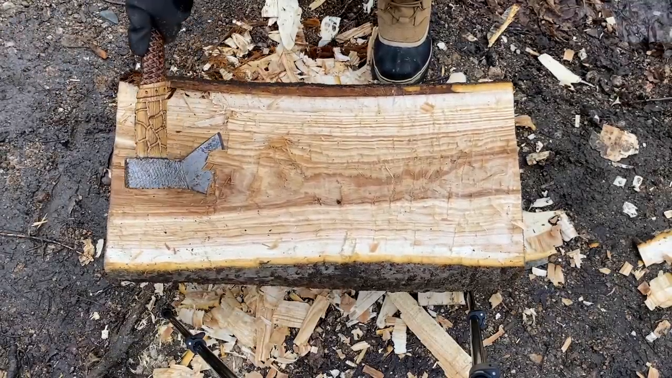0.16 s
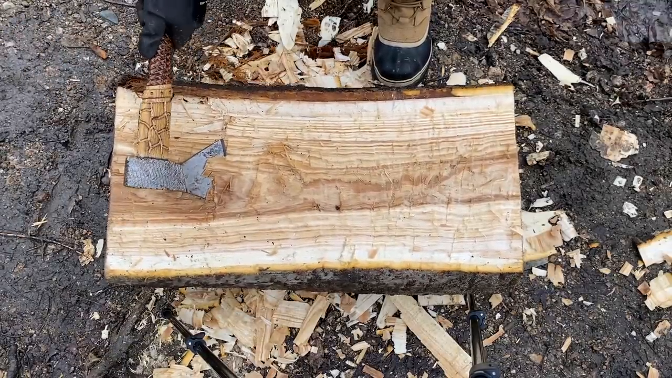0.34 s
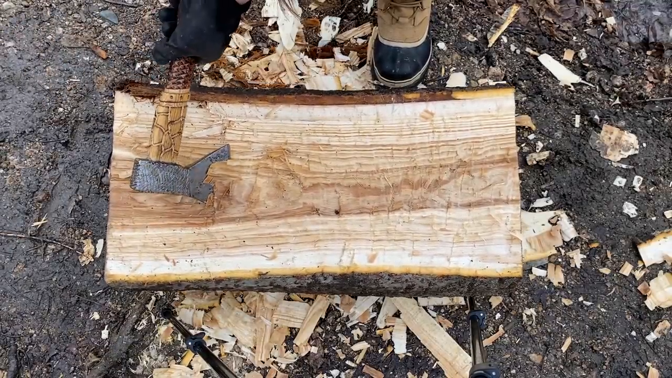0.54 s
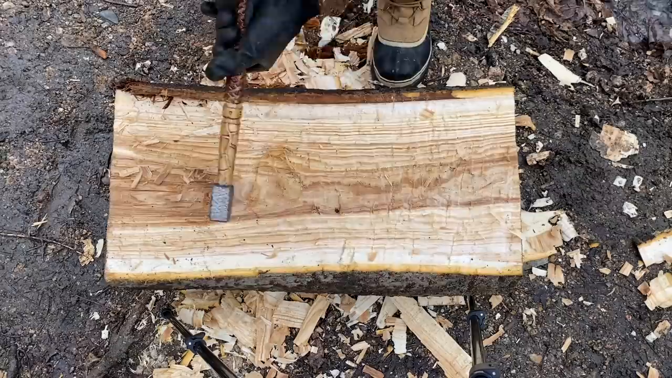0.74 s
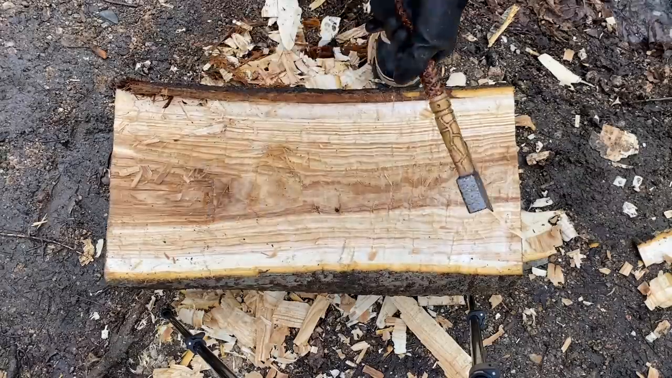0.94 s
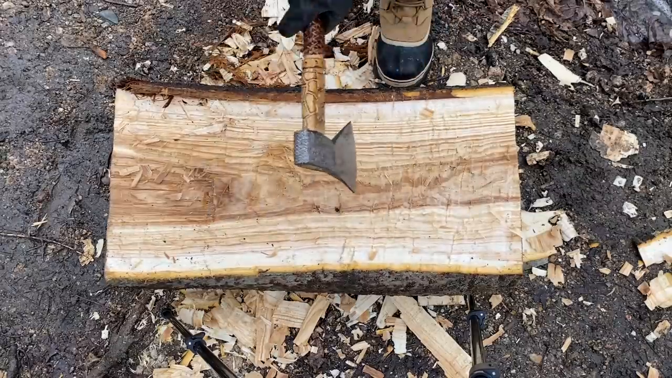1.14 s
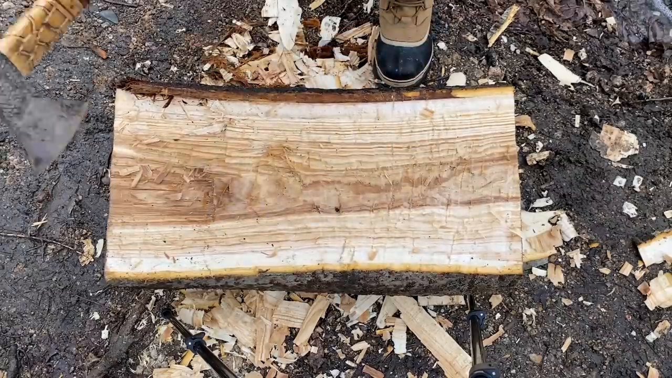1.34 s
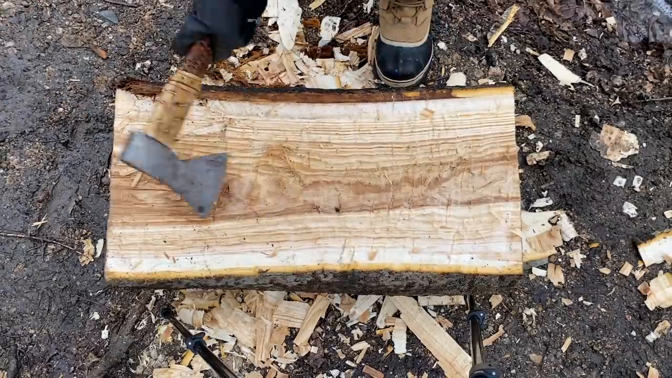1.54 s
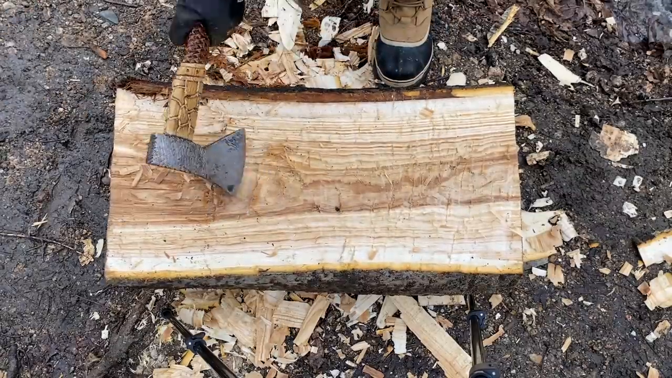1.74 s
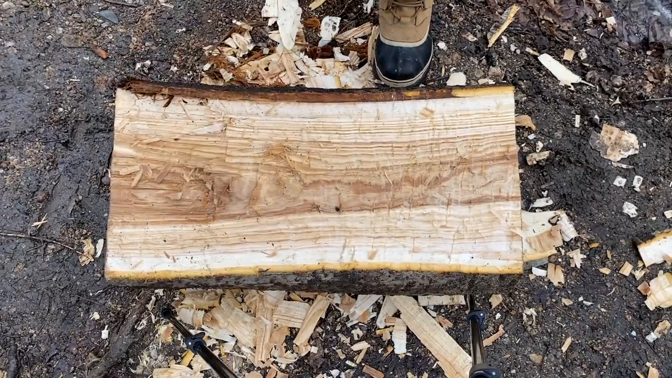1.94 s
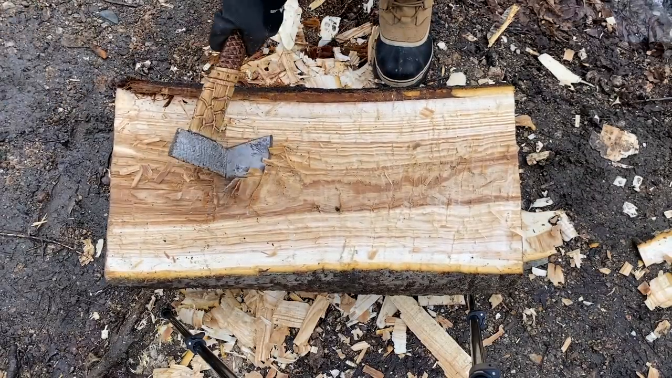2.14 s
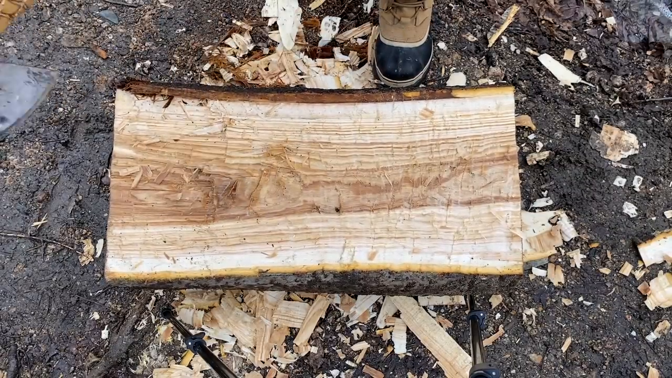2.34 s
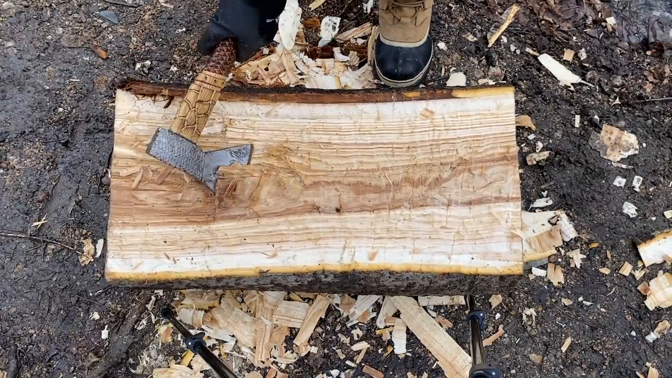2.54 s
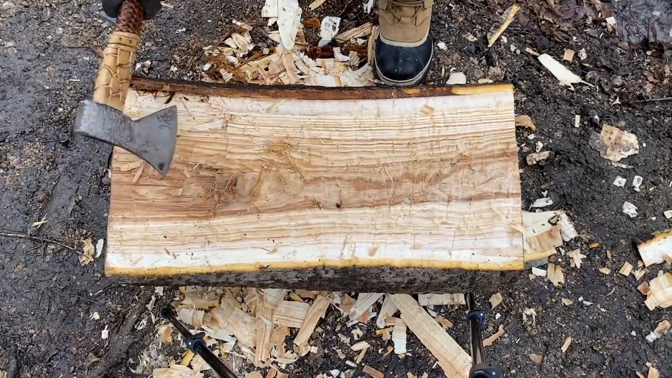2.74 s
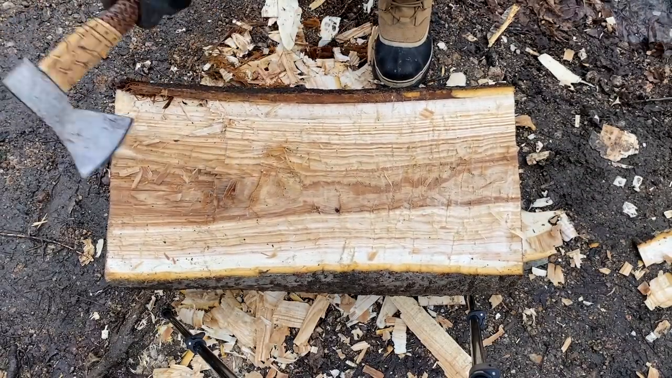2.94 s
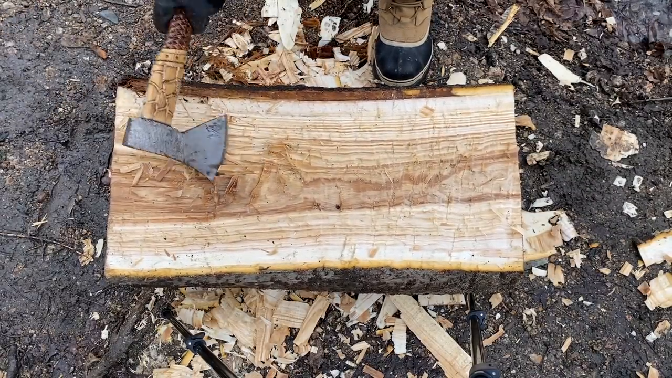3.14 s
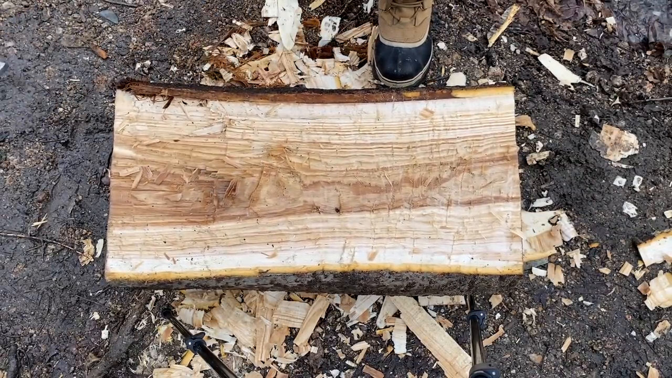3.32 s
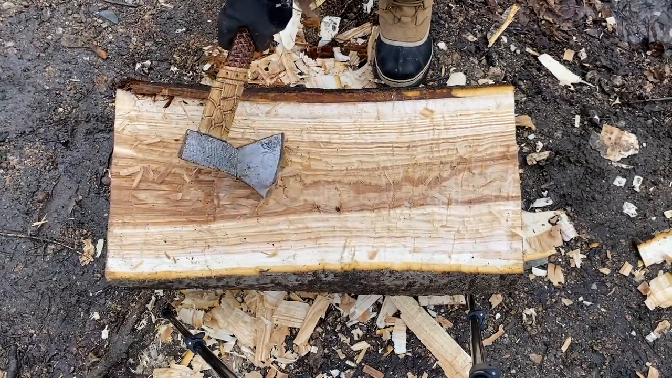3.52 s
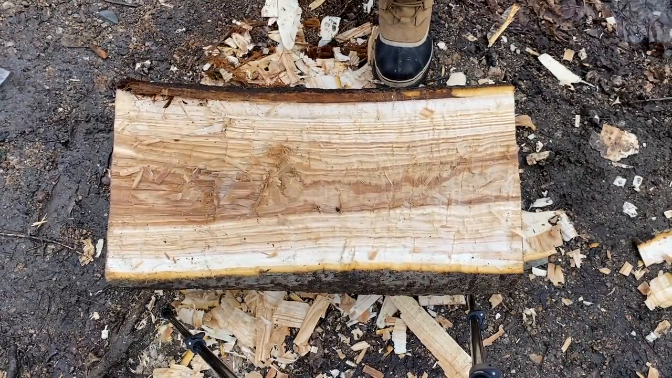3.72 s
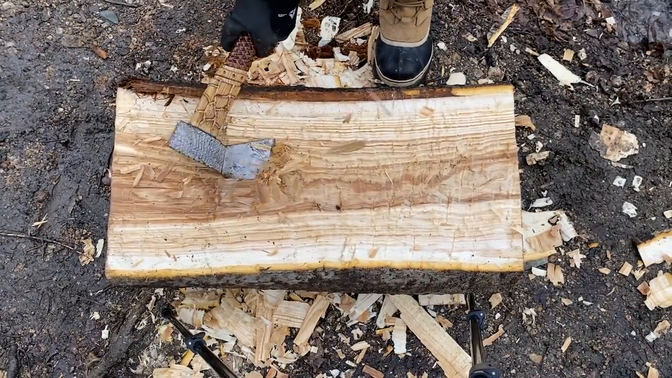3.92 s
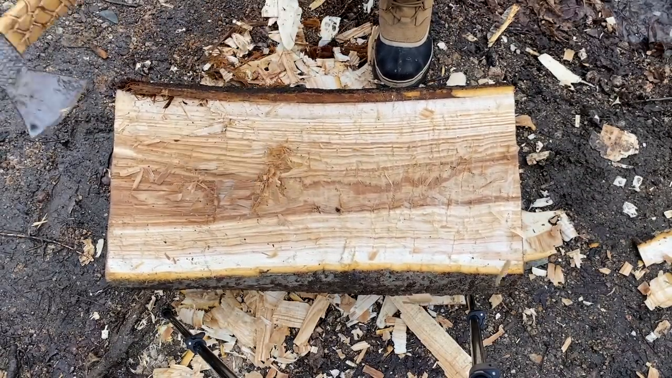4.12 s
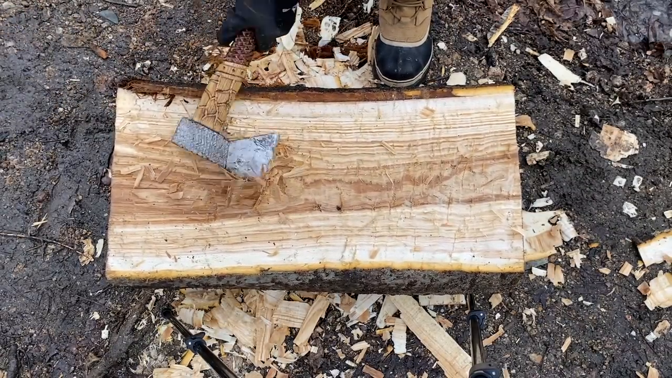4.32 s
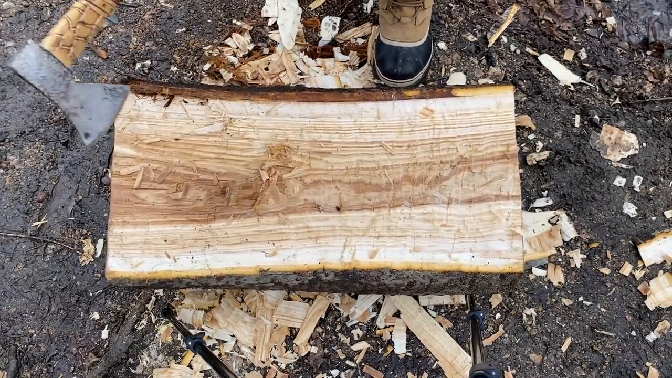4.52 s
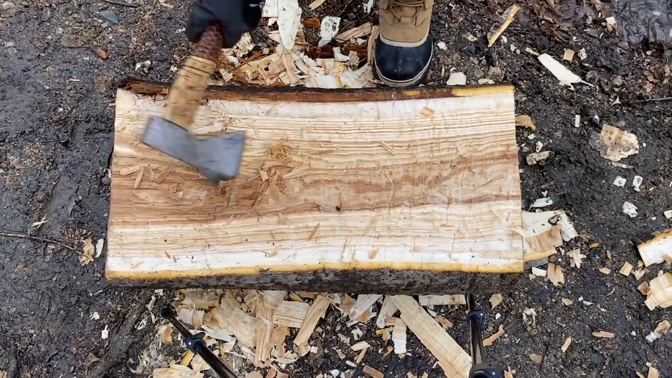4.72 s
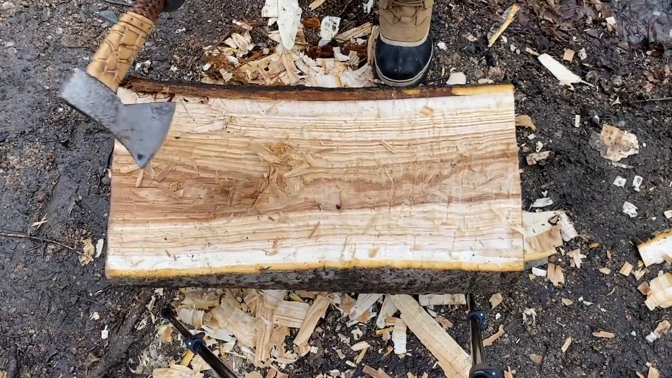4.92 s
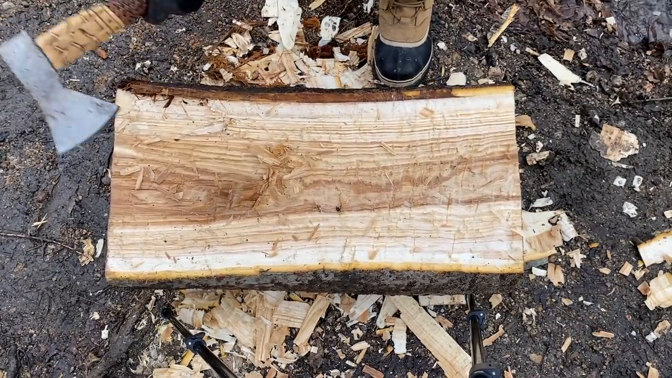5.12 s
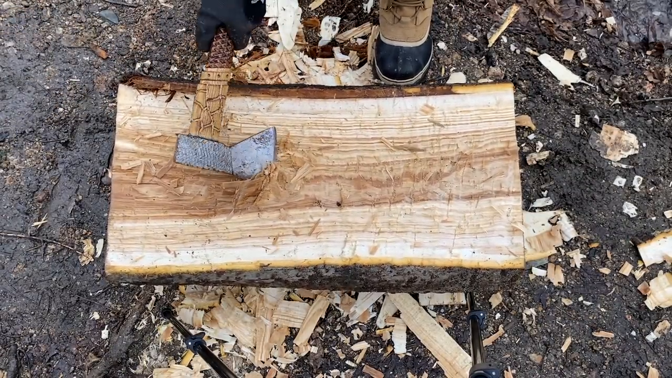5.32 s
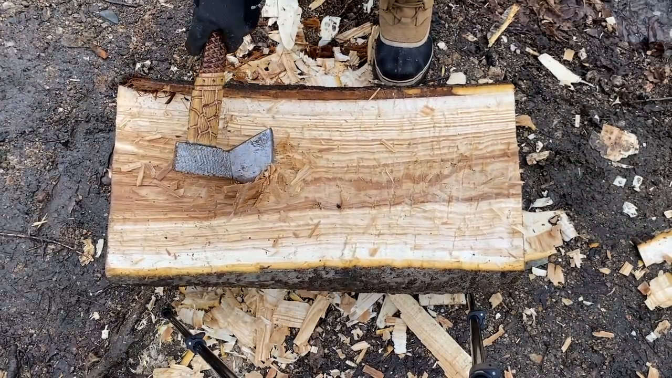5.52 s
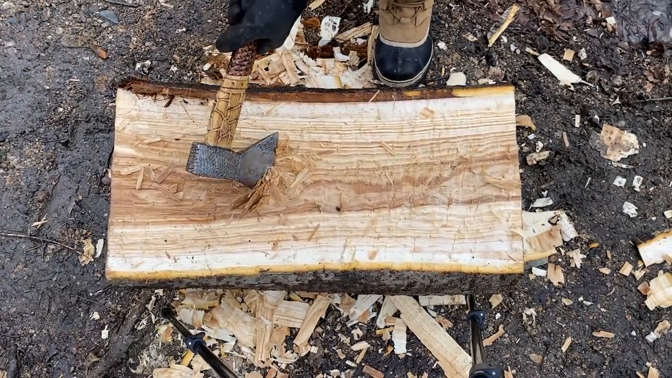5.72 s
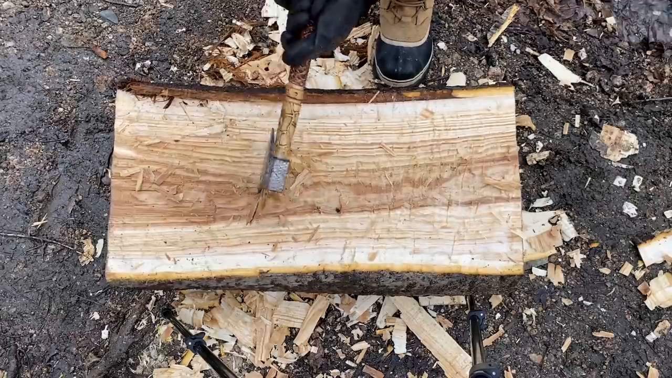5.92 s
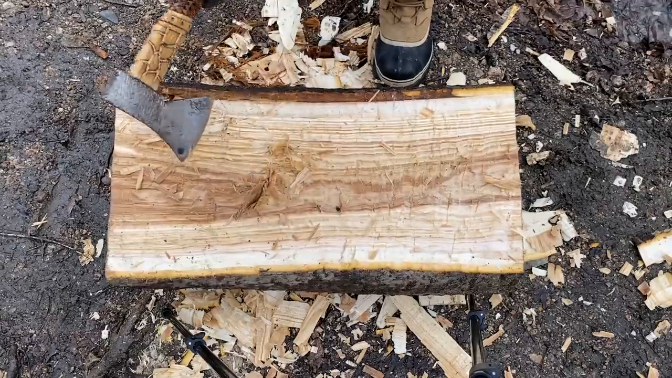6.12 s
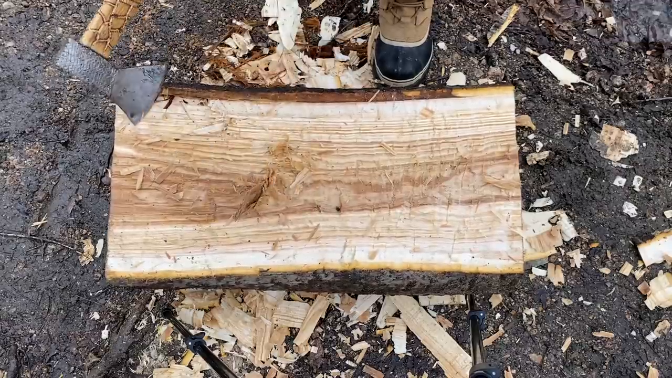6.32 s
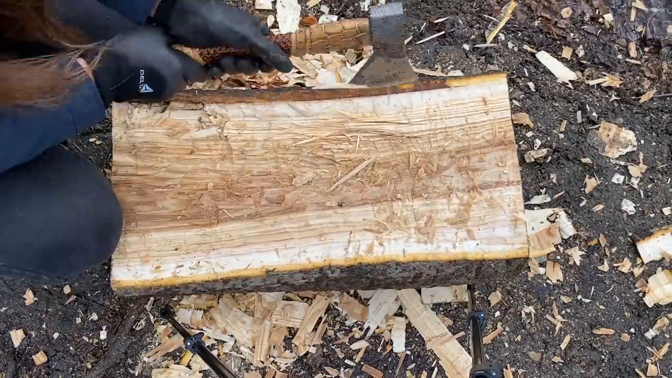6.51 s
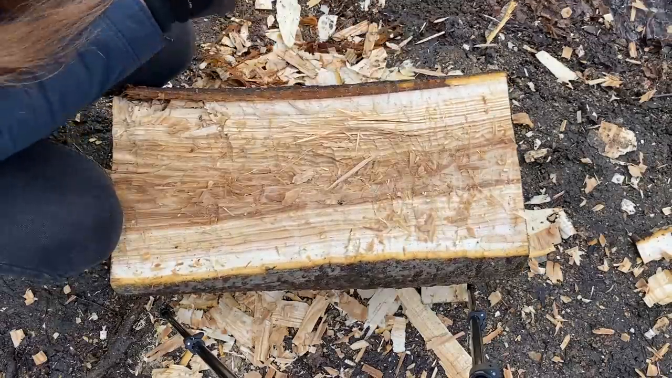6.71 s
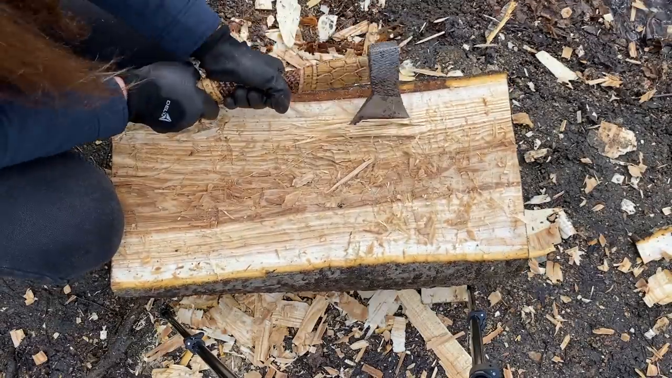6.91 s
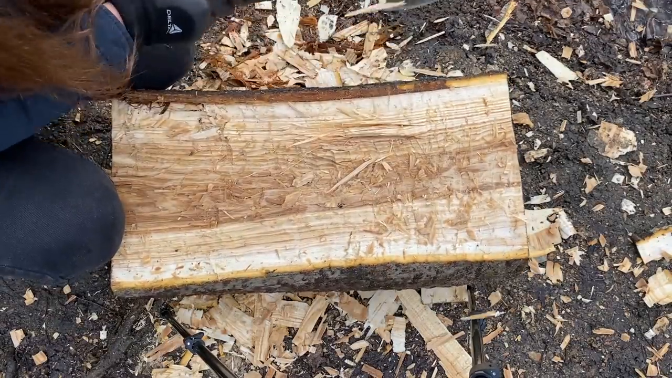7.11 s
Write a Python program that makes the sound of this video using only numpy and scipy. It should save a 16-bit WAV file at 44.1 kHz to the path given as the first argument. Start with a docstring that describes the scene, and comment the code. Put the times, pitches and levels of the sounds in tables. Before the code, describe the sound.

Steady broadband water rush fills the scene, leaning left, with low lumpy wind buffets on the stereo microphones. After a few loose chip snaps, a hatchet chops solid wood at a regular pace, each hit a dull thud, hard crack and splintery hiss with hardly any echo. More snaps and scraping crackles follow, then a final isolated chop near the end.

```python
"""Chopping wood near a waterfall

A hatchet chops into a split log outdoors. The edge bites and tears fibres (wood and hatchet modes kept
ringing by noise, plus splinter hiss), chips break loose, and shoves knock the log's low modes once.
Loose chips snap between blows as millisecond noise bursts. To the left a waterfall of shaped noise rushes
steadily; low rumbling noise is wind buffeting the microphones. The recorder's limiter holds the
strongest blows down, so that the water ducks after them."""
import sys
import numpy as np
from scipy import signal
from scipy.fft import rfft, irfft
from scipy.io import wavfile
from scipy.ndimage import uniform_filter1d, minimum_filter1d

SR = 44100
rng = np.random.default_rng(int(sys.argv[2]) if len(sys.argv) > 2 else 0)


def waveform_to_disk(signal):
    """Save audio, clipped to [-1, 1], as 16-bit WAV at the path in sys.argv[1]."""
    frames = np.transpose(np.atleast_2d(signal))
    scaled = np.clip(frames, -1, 1) * 32767
    samples = np.round(scaled).astype(np.int16)
    wavfile.write(sys.argv[1], SR, samples)


def gain_from_db(level_db):
    """Turn a decibel level (scalar or array-like) into a linear amplitude factor."""
    decades = np.asarray(level_db, float) / 20
    return 10 ** decades


N = 320166   # length in samples


def blows():
    """The hatchet blows: the log is shoved, its fibres tear and splinters hiss."""
    return shoved_log() + torn_fibres() + splinter_hiss()


# The head's weight shoves the log, which may rock back. Each row: start in seconds, relative push in dB.
SHOVES = [(1.5743, -1.5), (1.583, -26), (2.085, -5.5), (2.544, -16), (2.995, -13.5), (3.004, -13),
          (3.443, -14.5), (3.448, -17), (3.882, -8.5), (3.896, -18), (4.31, -12), (4.326, -12),
          (4.7486, -6), (4.7525, -15), (4.759, -15.5), (5.179, -8.5), (5.192, -13), (6.901, -13),
          (6.9032, -2)]
# Low modes of the log. Each row: pitch in Hz, relative level in dB, t60 in seconds.
LOG_THUD = [(87, 4, 0.021), (221, 4, 0.024), (320, 2.5, 0.03), (406.5, 3, 0.026), (547, -2.5, 0.035)]
# Middle modes of the log. Each row: pitch in Hz, relative level in dB, t60 in seconds.
LOG_KNOCK = [(660, 1.9, 0.011), (760, -6, 0.049), (1020, -3.5, 0.023), (1230, -1.4, 0.028),
             (1500, 3, 0.0095)]


def shoved_log():
    """Each shove is one click that sets the log's low and middle modes ringing."""
    push_response_db, knock_db = 8, -3.5   # answer of all modes; middle modes relative to low
    push = np.zeros((2, N))
    starts = [round(s * SR) for s, db in SHOVES]
    push[:, starts] = gain_from_db(np.array(SHOVES)[:, 1] + push_response_db)
    thud = band(body(push, LOG_THUD, spot_column=1), 64, 1500)   # soft contact: mostly lows
    knock = band(body(push, LOG_KNOCK, spot_column=2), 530, 1690)
    return thud + gain_from_db(knock_db) * knock


# Ringing modes of the hatchet. Each row: pitch in Hz, relative level in dB, t60 in seconds.
HATCHET = [(1670, -0.5, 0.0044), (2210, 0.5, 0.0045), (2877, -1.5, 0.0053), (4340, 6, 0.0026),
           (4500, 3.5, 0.0047), (5290, -1, 0.0069)]


def torn_fibres():
    """Tearing fibres keep the log's middle modes and the hatchet's modes sounding, like a bowed body."""
    knock = band(body(grains(spread_db=-0.5), LOG_KNOCK, spot_column=2), 550, 1700)
    knock = evened(knock, window_ms=4.0) * tearing(column=0, rise_ms=1.5, fall_ms=3.0)
    crack = band(body(grains(spread_db=-0.5), HATCHET, spot_column=3), 1400, 6500)
    crack = evened(crack, window_ms=2.5) * tearing(column=1, rise_ms=0.6, fall_ms=1.3)
    return knock + crack


def splinter_hiss():
    """Uneven bright clicks of splitting wood; thin splinters ring briefly."""
    splinters = grains(spread_db=12.5)
    splinters = splinters + 0.11 * ring(splinters, hz=7460, t60=0.0011)
    hiss = evened(band(splinters, 5560, 12500), window_ms=2.2)
    return hiss * tearing(column=2, rise_ms=0.46, fall_ms=1.0)


# The edge bites and tears fibres until it sticks.
# Each row: start in seconds, length in ms, knock in dB, crack in dB, splinter hiss in dB.
CUTS = [(1.5739, 2.3, -2.5, -5, -12.5), (2.0822, 7, -7, -0.5, -3), (2.5294, 7.3, -15, -16.5, -19),
        (2.9924, 13, -20, -12.5, -19.5), (3.442, 9.3, -21.5, -9, -12), (3.883, 7.3, -18.5, -14, -15.5),
        (4.309, 13, -19, -18, -21.5), (4.747, 4.8, -20, -10.5, -13.5), (5.179, 18, -13.5, -14.5, -20),
        (6.8978, 4.7, -15.5, -10.5, -12.5)]
# A chip breaks loose within a blow.
# Each row: start in seconds, knock in dB, crack in dB, splinter hiss in dB.
BREAKS = [(2.098, -38, -31, -35), (2.5336, -18, -3.5, -3.5), (2.537, -16, -5, -16), (2.541, -10.5, 0, -17),
          (3.0, -22, -19, -8), (3.004, -22, -13, -5), (3.448, -22, -9, -8), (3.898, -24, -24, -27),
          (4.313, -25, -24, -8.5), (4.3251, -14, -12.5, -1.5), (4.757, -9, -11, -14),
          (5.193, -10.5, -7.5, -14), (6.9018, -6.5, -20, -29), (6.9065, -8, -30, -35)]
# Tearing weakens as the edge slows. One row: sag of knock, crack and hiss in dB per ms.
SAG_DB_PER_MS = [0.62, 0.33, 0.0]


def tearing(column, rise_ms, fall_ms):
    """How hard fibres tear: sharp rise, slow sag while the edge moves, then a two-stage fall."""
    break_ms, tail_db, tail_ms = 1.24, -3, 2
    force = np.zeros(N)
    t = np.arange(round(0.06 * SR)) / SR * 1000   # ms
    chips = [(s, break_ms, *levels) for s, *levels in BREAKS]
    for s, ms, *levels in CUTS + chips:
        after = np.maximum(t - ms, 0)
        shape = np.clip(t / rise_ms, 0, 1) * gain_from_db(-SAG_DB_PER_MS[column] * np.minimum(t, ms))
        tail = gain_from_db(tail_db) * np.exp(-after / tail_ms)
        shape = shape * np.maximum(np.exp(-after / fall_ms), tail)
        i = round(s * SR)
        force[i:i + len(t)] = np.maximum(force[i:i + len(t)], gain_from_db(levels[column]) * shape)
    return force


# The spot that a blow strikes favours the modes near these pitches. Each row: start in seconds,
# thud in Hz, knock in Hz, crack in Hz, choosiness in dB per octave.
SPOTS = [(1.57, 415, 1020, 2630, 7.5), (2.08, 200, 1500, 2500, 9), (2.52, 407, 1330, 2480, 13),
         (2.99, 240, 1460, 2320, 3.5), (3.44, 234, 1300, 2640, 4), (3.88, 480, 690, 2760, 7.5),
         (4.3, 320, 1510, 5000, 5), (4.74, 350, 1100, 2900, 13), (5.17, 350, 1240, 2500, 10.5),
         (6.89, 320, 730, 2900, 9.5)]


def body(x, modes, spot_column):
    """All modes in parallel, signs alternating, each as strong as the spot of the current blow allows."""
    spots = np.array(SPOTS)
    favoured_hz, choosiness = spots[:, spot_column], spots[:, 4]
    # each spot takes over 30 ms ahead of its time
    blow = np.clip(np.searchsorted(spots[:, 0] - 0.03, np.arange(N) / SR) - 1, 0, None)
    shares = np.array([gain_from_db(db - choosiness * np.abs(np.log2(hz / favoured_hz))) for hz, db, t60 in modes])
    shares = shares / np.sqrt(np.sum(shares ** 2, axis=0))
    return sum((-1) ** k * ring(x * shares[k][blow], hz, t60) for k, (hz, db, t60) in enumerate(modes))


def ring(x, hz, t60):
    """Two-pole resonator: a unit click sets a decaying sine of height 1 ringing."""
    r, w = gain_from_db(-60 / (t60 * SR)), 2 * np.pi * hz / SR
    return signal.lfilter([0, np.sin(w)], [1, -2 * r * np.cos(w), r * r], x + 1e-18)


def grains(spread_db):
    """Two rows of dense uneven clicks, rms 1."""
    unevenness = np.minimum(rng.exponential(1, (2, N)), 4)
    return rms_one(rng.standard_normal((2, N)) * gain_from_db(spread_db * unevenness))


# Chips and grit snapping on the log.
# Each row: start in seconds, peak in dB, pitch in Hz, weight of the broad crackle (a factor).
SNAPS = [(0.533, -6, 4530, 0.6), (0.544, -11, 4500, 0.8), (0.555, -14, 5060, 0.45), (0.63, -15, 7150, 0.7),
         (0.6444, -16, 10900, 0.4), (0.658, -19.5, 1650, 0.05), (0.67, -17, 1700, 0.068),
         (4.8968, -18.5, 2680, 0.4), (5.3173, -16, 2240, 0.1), (5.3933, -4.5, 2590, 0.7),
         (5.7074, -10.5, 7850, 0.78), (5.7376, -14, 7000, 0.5), (5.775, -12, 2680, 0.68),
         (7.095, -14, 5170, 0.44)]


def snaps():
    """Each snap is noise dying within milliseconds: a band around the chip's pitch plus broad crackle."""
    out = np.zeros((2, N))
    t = np.arange(round(0.008 * SR)) / SR
    fade = np.exp(-t / 0.001)
    for s, db, hz, broad in SNAPS + crackles():
        noise = rng.standard_normal((2, len(t))) * fade
        burst = band(noise, hz * 0.81, hz * 1.21) + broad * band(noise, 990, 11200)
        i = round(s * SR)
        out[:, i:i + len(t)] += gain_from_db(db) * burst / np.abs(burst).max()
    return out


# The head drags through loose chips.
# Each row: start in seconds, length in seconds, highest peak of its crackles in dB.
DRAGS = [(0.577, 0.115, -17), (5.741, 0.093, -17)]


def crackles():
    """Bright rows in the form of the snaps, scattered at random over each drag."""
    crackles_per_s = 80
    rows = []
    for s, length, db in DRAGS:
        for when, weak, pitch in rng.random((round(length * crackles_per_s), 3)):
            rows.append((s + length * when, db - 5.4 * weak, 3000 * 3.6 ** pitch, 0.5))
    return rows


def surroundings(x, level_db, t60):
    """A short dull tail from ground and trees: the sound convolved with decaying noise."""
    t = np.arange(round(0.15 * SR)) / SR
    tail = band(rng.standard_normal((2, len(t))), 220, 4900) * gain_from_db(-60 * t / t60)
    tail = tail * (t > 0.004)   # the first reflections arrive after 4 ms
    tail = tail / np.sqrt(np.sum(tail ** 2) / 2)
    return gain_from_db(level_db) * signal.fftconvolve(x, tail, axes=1)[:, :N]


# The log at the two microphones. Each row: pitch in Hz, left over right in dB, likeness from 0 to 1.
LOG_AT_PAIR = [(200, 6, 0.84), (1010, 8, 0.56), (2500, 3, 1), (3800, 14, 1), (4860, 1, 0.47),
               (6350, 46, 0.12)]
# Phase by which the log leads on the right. Each row: pitch in Hz, lead in radians.
LOG_LEAD = [(200, 0), (1000, -.3), (2500, -1.5), (3400, -1.6), (3900, 0), (5200, 1.1), (6200, 0)]


def log_at_pair():
    """Blows, snaps and their tail, set in the stereo picture by level, phase and likeness."""
    log = blows() + snaps()
    log = log + surroundings(log, level_db=-20.0, t60=0.024)
    return pair(log, LOG_AT_PAIR, LOG_LEAD)


# The waterfall at the two microphones, before flow and flicker.
# Each row: pitch in Hz, left level in dB per Hz, left over right in dB, likeness from 0 to 1.
WATER = [(91, -73.5, 1, 0.66), (145, -62.5, 3, 1), (350.0, -65, 2, 0.95), (587, -66, 5.5, 0.06),
         (854, -64.5, 10, 0.46), (1630, -68.1, 2.5, 0.5), (2240, -69, 5.5, 0.3), (2900.0, -69, 9.5, 0.18),
         (3870, -73.5, 3.5, 0.66), (5260, -71.5, 10, 0.43), (5730, -74.5, 2, 0), (7000.0, -77.5, 29, 0.4),
         (10200, -79.5, 11, 0.99), (16700, -90.5, 0.0, 1.0)]
# Phase by which the water leads on the right. Each row: pitch in Hz, lead in radians.
WATER_LEAD = [(90.0, 0.2), (170.0, -0.3), (350.0, -0.8), (600.0, -1.4), (900.0, -1.4), (1600.0, -2.0),
              (2400.0, -3.1), (2900.0, -6.5), (4000.0, -6.3), (5200.0, -6.5), (6000.0, -7.1),
              (7000.0, -6.3)]
# Loudness of the waterfall as the air shifts. Each row: time in seconds, level change in dB.
FLOW = [(0, 0), (.7, 0.84), (1.4, 0), (2.4, 0.5), (3.2, 0), (4, -0.84), (4.6, 0), (5.5, 0), (6.2, -0.5),
        (6.6, 1), (7.26, 1.4)]


def waterfall(patchy_db):
    """Dense far spray: smooth noise whose octave bands flicker a little."""
    hz = np.fft.rfftfreq(N, 1 / SR) + 1
    at_hz, level_db = np.array(WATER)[:, 0], np.array(WATER)[:, 1]
    colour = gain_from_db(np.interp(np.log(hz), np.log(at_hz), level_db))
    colour = colour / np.sqrt(1 + (75 / hz) ** 6) / np.sqrt(1 + (hz / 15900) ** 60)   # low and high cut
    # neighbouring bands take turns between two unrelated noises, so that their powers add up evenly
    spectra = rfft(rng.standard_normal((2, 2, N))) * colour * np.sqrt(SR / 2)
    spray = 0
    for k, centre in enumerate(30 * 2.0 ** np.arange(10)):
        share = np.cos(np.pi / 2 * np.clip(np.log2(hz / centre), -1, 1))
        spray = spray + irfft(spectra[k % 2] * share, N) * gain_from_db(patchy_db * drift(4.3))
    flow_db = np.interp(np.arange(N) / SR, *np.transpose(FLOW))
    return pair(spray * gain_from_db(flow_db), WATER, WATER_LEAD)


# Buffets of wind on the microphones. Each row: start in seconds, hold in seconds, rumble level in dB.
BUFFETS = [(0.184, 0.01, -36.5), (0.41, 0.0093, -43.5), (1.03, 0.01, -51), (1.24, 0.093, -44.5),
           (2.453, 0.02, -27), (2.737, 0.07, -36), (2.932, 0.01, -47), (3.09, 0.01, -41), (4.0, 0.054, -41),
           (4.844, 0.17, -31), (5.39, 0.013, -29), (5.576, 0.03, -31.5), (5.72, 0.06, -43),
           (6.523, 0.005, -33), (6.98, 0.013, -34)]


def wind(lumpy_db, alike):
    """Lumpy low rumble, nearly the same on both sides; buffets swell, hold and fade above a breeze."""
    breeze_db, swell_db_per_s, fade_db_per_s = -54, 217, 254
    shake_db, shake_lag_s = -38, 0.033   # each blow shakes the stand into the same rumble
    t = np.arange(N) / SR
    db = breeze_db + lumpy_db * drift(2.9)
    shakes = [(row[0] + shake_lag_s, 0, shake_db) for row in CUTS]
    for s, hold, top_db in BUFFETS + shakes:
        swell = swell_db_per_s * np.maximum(s - t, 0)
        fade = fade_db_per_s * np.maximum(t - s - hold, 0)
        db = np.maximum(db, top_db - swell - fade)
    rumble = band(band(rng.standard_normal((2, N)), 34, 80.5), 43, 170)
    mid, side = evened(rumble, window_ms=86.0)
    both = mid + np.sqrt(1 - np.clip(alike, 0, 1)) * side * [[1], [-1]]
    return gain_from_db(db) * both * gain_from_db([[0.6], [-0.6]])   # slightly louder on the left


def drift(rate):
    """Slow random wander of rms 1: noise through a two-pole low-pass at rate Hz, made every 40 samples."""
    r = np.exp(-80 * np.pi * rate / SR)
    slow = signal.lfilter([1], [1, -2 * r, r * r], rng.standard_normal(N // 40 + 2002))[2000:]
    return np.interp(np.arange(N) / 40, np.arange(len(slow)), rms_one(slow))


def rms_one(x):
    """Scale to rms 1."""
    return x / np.sqrt(np.mean(x ** 2) + 1e-20)


def band(x, low_hz, high_hz):
    """Butterworth band-pass."""
    edges = [low_hz, min(high_hz, 0.45 * SR)]
    return signal.sosfilt(signal.butter(2, edges, "band", fs=SR, output="sos"), x)


def evened(x, window_ms):
    """Hold the level near 1 from moment to moment."""
    power = uniform_filter1d(x ** 2, round(window_ms * SR / 1000))
    return x / np.sqrt(np.abs(power) + 1e-12)


def pair(sound, table, lead_table):
    """Left is the first row; right mixes it, phase-shifted, with the unrelated second row."""
    hz = np.log(np.fft.rfftfreq(N, 1 / SR) + 1)
    at, *columns = np.transpose(table)
    over_db, alike = [np.interp(hz, np.log(at), c) for c in columns[-2:]]
    lead_hz, lead_rad = np.transpose(lead_table)
    lead = np.interp(hz, np.log(lead_hz), lead_rad)
    alike = np.clip(alike, 0, 1)
    a, b = rfft(sound)
    right = gain_from_db(-over_db) * (alike * np.exp(1j * lead) * a + np.sqrt(1 - alike ** 2) * b)
    return np.array([sound[0], irfft(right, N)])


def scene():
    """Log, water and wind at the two microphones."""
    return log_at_pair() + waterfall(patchy_db=1.0) + wind(lumpy_db=6.5, alike=0.97)


def limiter(x):
    """Loud mids and highs on the left pull both gains down at once; they hold, then climb back steadily."""
    ceiling_db, hold_s, release_db_s = -10, 0.08, 110
    sensed = uniform_filter1d(band(x[0], 1500, 16000) ** 2, round(0.0025 * SR))
    over = np.maximum(10 * np.log10(np.abs(sensed) + 1e-12) - ceiling_db, 0)
    hold = round(hold_s * SR) // 2 * 2 + 1
    held = -minimum_filter1d(-over, hold, origin=hold // 2)   # largest excess of the last hold_s
    ramp = release_db_s * np.arange(N) / SR
    cut = np.maximum.accumulate(held + ramp) - ramp
    smooth = round(0.04 * SR)
    cut = np.maximum(held, uniform_filter1d(cut, smooth, origin=smooth // 2 - 1))
    x = x * gain_from_db(-cut)
    return x / (1 + np.abs(x / 0.95) ** 4) ** 0.25   # round the peaks that remain


def roll_off(x):
    """The treble ends steeply here."""
    return signal.sosfilt(signal.butter(12, 16970, fs=SR, output="sos"), x)


def record(dry):
    """Both sides share one capsule's treble, which reaches the left late; top cut and limiter follow."""
    treble_hz, treble_width_hz = 6450, 310
    in_step_hz, turn_hz = 7000, 4200   # the sides agree in phase at in_step_hz and every turn_hz from it
    hz = np.fft.rfftfreq(N, 1 / SR)
    shared = 1 / (1 + np.exp(-(hz - treble_hz) / treble_width_hz))
    left, right = rfft(dry)
    turns = (np.minimum(hz, in_step_hz + 2 * turn_hz) - in_step_hz) / turn_hz   # in step at the very top
    early = left * np.exp(2j * np.pi * turns)
    right = np.sqrt(1 - shared ** 2) * right + shared * early
    steep = 1 / np.sqrt(1 + (hz / 16200) ** 60)
    finished = limiter(irfft([left * steep, right * steep], N))
    return roll_off(finished)


dry = scene()
out = record(dry)
waveform_to_disk(out)
```